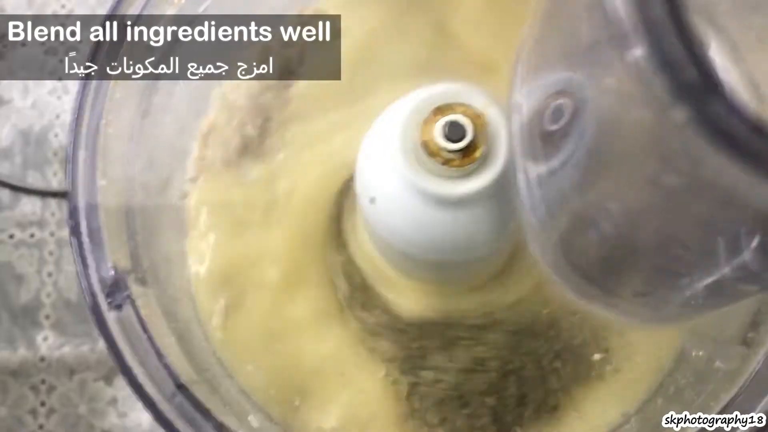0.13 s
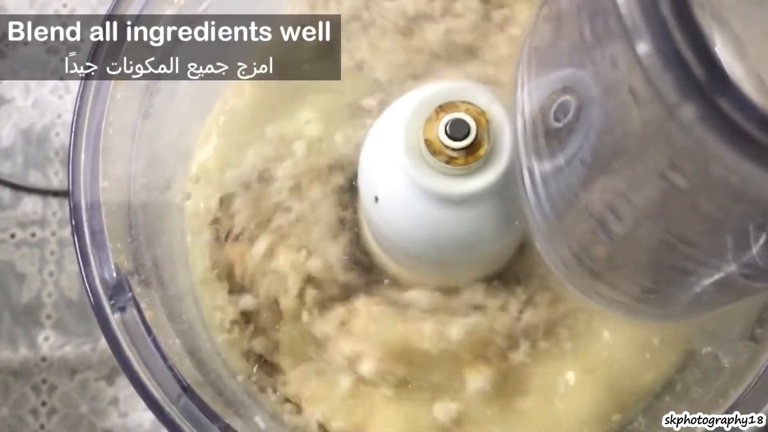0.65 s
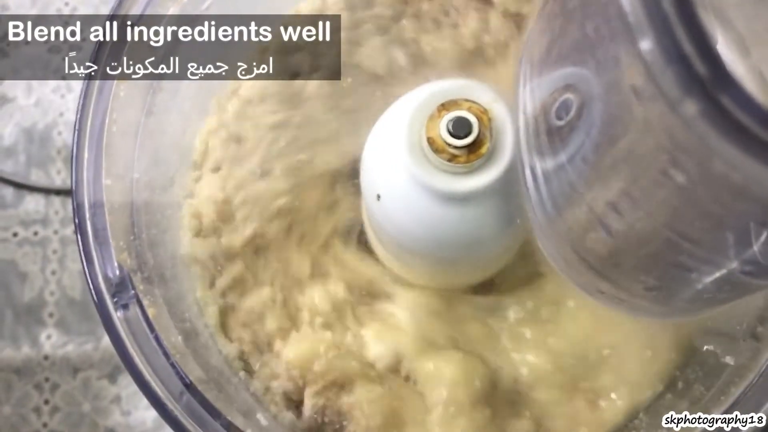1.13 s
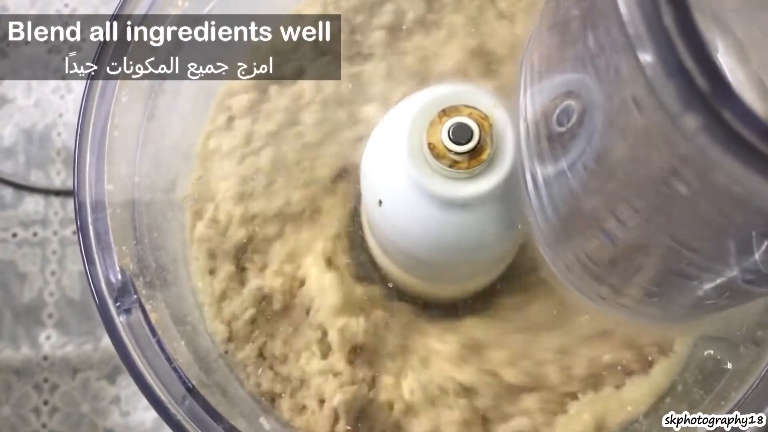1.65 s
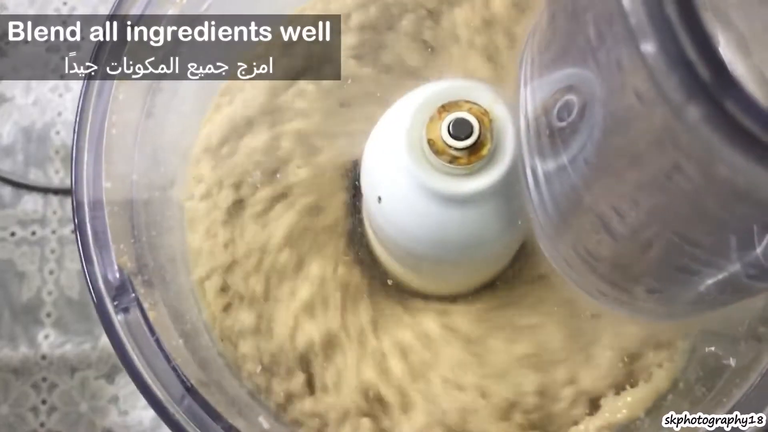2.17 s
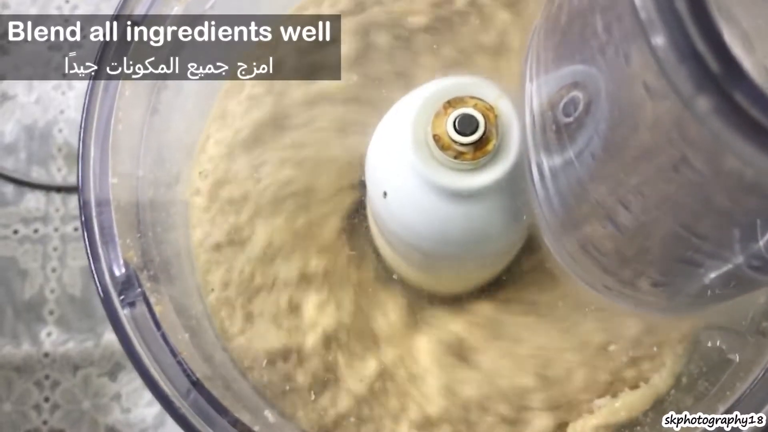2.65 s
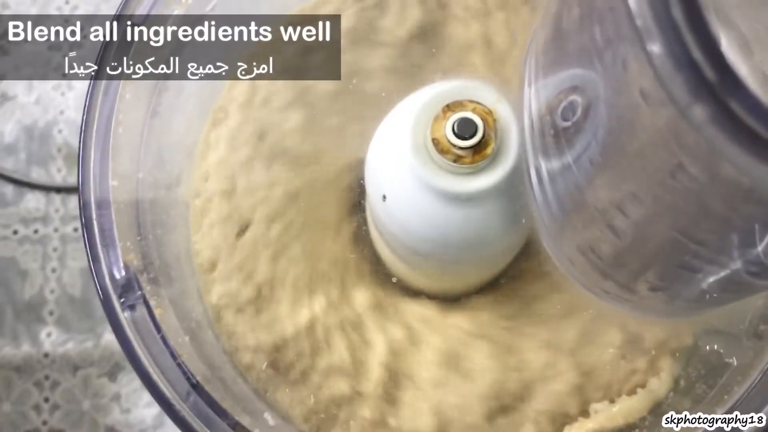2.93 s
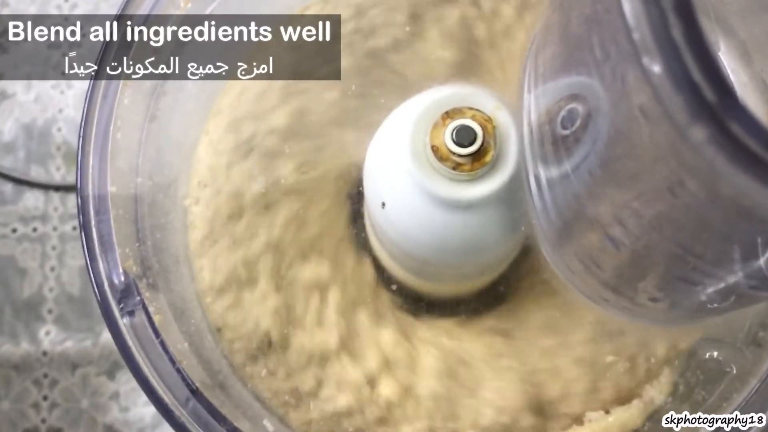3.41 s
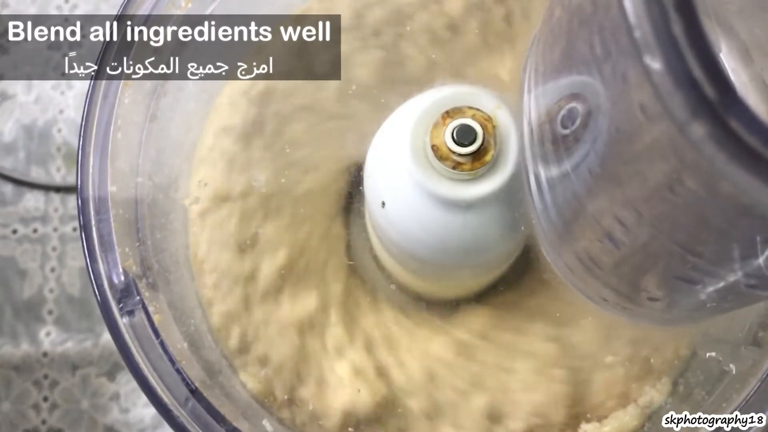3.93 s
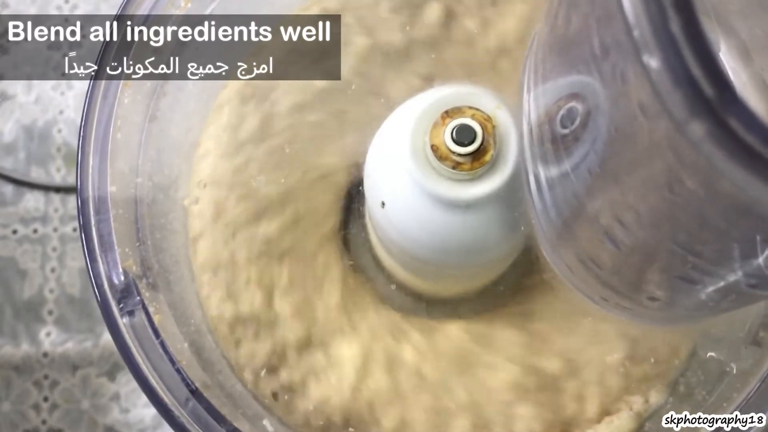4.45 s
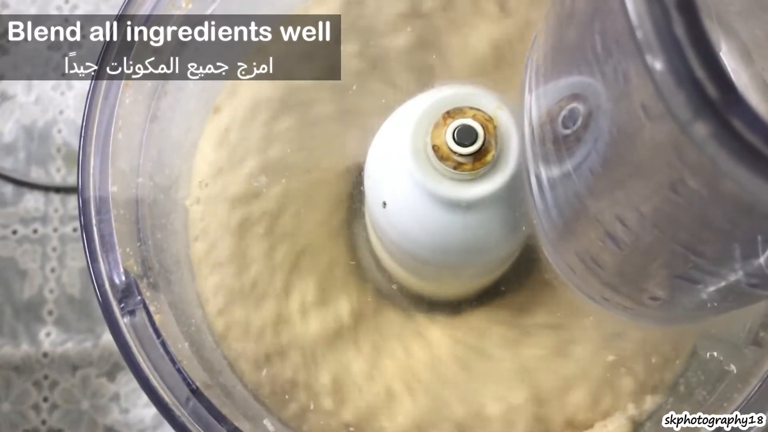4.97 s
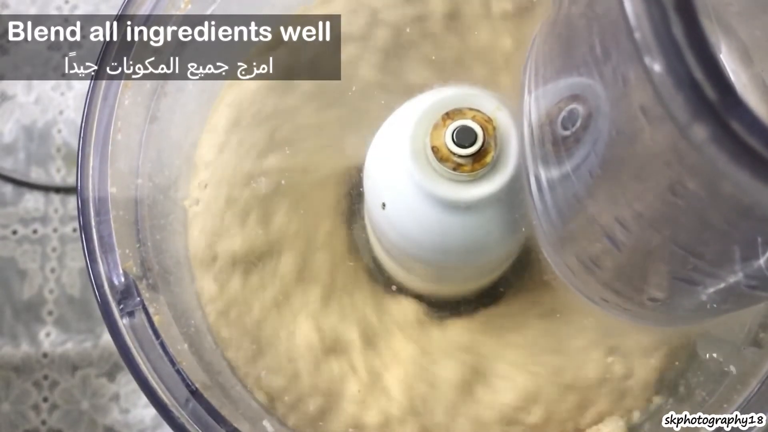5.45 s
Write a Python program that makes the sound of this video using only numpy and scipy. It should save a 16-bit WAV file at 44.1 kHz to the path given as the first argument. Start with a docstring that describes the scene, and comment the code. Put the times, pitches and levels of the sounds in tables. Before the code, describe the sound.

A food processor is pulsed four times through thick batter, its geared motor whining up and coasting down in a quiet kitchen.

```python
"""Hands on the bowl are heard first, fading into the quiet of a kitchen; then a geared food processor is pulsed
four times through a thick batter. Gear teeth whine at a pitch that follows the motor speed, throbbing with each
turn of the blade; whine and rushing noise ring in the plastic housing. The first run coasts down, with one
knock; the sound then jumps from the second run straight into the third. The third, on the slow setting, has the
strongest hum at the mains rate; it coasts too, and the fourth lasts to the end."""
import sys
import numpy as np
from scipy import signal
from scipy.fft import rfft, irfft, next_fast_len
from scipy.io import wavfile
from scipy.ndimage import uniform_filter1d

SR = 44100
rng = np.random.default_rng(int(sys.argv[2]) if len(sys.argv) > 2 else 0)


def persist_wave(psi):
    """Save psi, clipped to +-1, as 16-bit WAV."""
    counts = np.round(np.clip(psi, -1, 1) * 32767).astype(np.int16)
    wavfile.write(sys.argv[1], SR, np.atleast_2d(counts).T)


def rack_gain(trim_db):
    """Turn a fader trim in dB into the linear factor to multiply a signal by."""
    fader = np.asarray(trim_db, float)
    return 10 ** (fader / 20)


N = 246519
THIRD_RUN_S = 1.888   # the sound jumps here from the second run straight into the third
TEETH_PER_BLADE_TURN, TEETH_PER_ROTOR_TURN = 138, 12
LOW_GEAR_RATIO = .3822   # low gear tone over tooth rate


def at_hz(points, hz):
    """Spectral interpolation: levels joined by straight lines on a logarithmic frequency axis."""
    f, db = np.transpose(points)
    return np.interp(np.log(hz), np.log(f), db)


def drift(rate):
    """Low-pass random process: white noise through two equal poles at rate [Hz], scaled to spread 1."""
    r = np.exp(-2 * np.pi * rate / SR)
    slow = signal.lfilter([1], [1, -2 * r, r * r], rng.standard_normal(N + SR))[SR:]
    return slow / np.std(slow)


def coloured(points):
    """Spectral shaping of white noise by levels in dB per Hz; 0 dB gives 1 kHz of band an rms of 1."""
    size = next_fast_len(N)
    hz = np.maximum(np.arange(size // 2 + 1) * SR / size, 1)
    gain = rack_gain(at_hz(points, hz)) * np.sqrt(SR / 2000)
    white = rng.standard_normal(size)
    return irfft(rfft(white) * gain, size)[:N]


# spectral shape of the quiet kitchen: (frequency [Hz], density [dB per Hz])
ROOM_SPECTRUM = [(24, -32), (40, 1), (129, 2.5), (174, -12), (301, -14), (1100, -42), (1350, -16.5),
                 (4800, -37), (5720, -22), (6640, -33), (15500, -45)]
# handling before the first run: (time [s], level [dB])
HANDS_LEVEL = [(0.0, -41), (0.07, -53)]


def kitchen():
    """Stationary and enveloped noise: a steady room floor, and hands on the bowl that fade at first."""
    floor = coloured(ROOM_SPECTRUM)
    hands = coloured([(60, 8), (200, 5), (800, -10), (3000, -24), (10000, -38)])
    rows = list(HANDS_LEVEL) + [(HANDS_LEVEL[-1][0] + .02, -80)]
    s, db = np.transpose(rows)
    hands_db = np.interp(np.arange(N) / SR, s, db)
    return rack_gain(-50) * floor / np.std(floor) + rack_gain(hands_db) * hands / np.std(hands)


# motor runs: (on [s], off [s], tooth rate at the start [Hz], tooth rate the climb tends to [Hz],
# share of the climb that is quick [0-1], creep [Hz per s], coasting time constant [s])
MOTOR_RUNS = [(.158, .5232, 267, 2900, .619, 0, .249), (1.07, 9, 410, 3114, .55, 0, .3),
              (1.888, 4.243, 729, 2466, .322, 37, .376), (4.51, 9, 1161, 3357, .418, 0, .3)]


def motor():
    """Inertia and friction: speed climbs with two time constants, then coasts to rest under dry friction."""
    quick_s, slow_s, friction_hz = .0467, .178, 365
    release_s = .02   # the drive dies away at switch-off
    runs = np.array(MOTOR_RUNS)
    t = np.arange(N) / SR
    run = np.maximum(np.searchsorted(runs[:, 0], t, side="right") - 1, 0)
    on, off, start_hz, top_hz, quick, creep, coast_s = runs[run].T
    driven = np.maximum(np.minimum(t, off) - on, 0)
    left = quick * np.exp(-driven / quick_s) + (1 - quick) * np.exp(-driven / slow_s)
    reached_hz = top_hz - (top_hz - start_hz) * left + creep * driven
    after = np.maximum(t - off, 0)
    free = after - release_s * (1 - np.exp(-after / release_s))
    tooth_hz = (reached_hz + friction_hz) * np.exp(-free / coast_s) - friction_hz
    return run, t - on, np.maximum(tooth_hz, 20), reached_hz, t > off


# relative layer levels, one row a run: (rush [dB], whine [dB], low gear [dB], bowl ring [dB],
# table rumble [dB], mains hum [dB])
LEVELS_BY_RUN = [(-35.5, -1, -20, -34, -34, -44), (-34.5, -1.5, -4.5, -57, -38, -48),
                 (-33.5, 0, -1.5, -29, -35.5, -35), (-32, 0.5, 1, -33.5, -34, -51)]
# how each named layer follows the motor: (surge at switch-on [dB], fading of the surge [s],
# step at switch-off [dB], loss while coasting [dB per octave of speed lost])
MOTOR_RESPONSE = {"rush": (-3, 0.4, -2, 5.5), "whine": (5.3, 0.26, 0.87, 0.61), "gear": (9, .05, -5, 7),
                  "bowl": (11, .05, -7, 5), "rumble": (4, .08, 2.5, 9.5), "hum": (-2, .1, 2, 10.5)}


def layer_levels(run, since, tooth_hz, reached_hz, coasting):
    """Power law of speed: each layer [dB] surges at switch-on and falls by dB per octave while coasting."""
    out, third_run = [], round(THIRD_RUN_S * SR)
    r = np.exp(-1 / (.017 * SR))   # smoothing time 17 ms
    octaves = np.log2(tooth_hz / reached_hz)
    for run_db, response in zip(np.transpose(LEVELS_BY_RUN), MOTOR_RESPONSE.values()):
        surge_db, surge_s, off_db, slope_db = response
        surge = surge_db * np.exp(-np.maximum(since, 0) / surge_s)
        db = run_db[run] + surge + coasting * (off_db + slope_db * octaves)
        gain = rack_gain(db) * (since >= 0)
        # the third run rises from zero
        parts = gain[:third_run], gain[third_run:]
        gain = np.concatenate([signal.lfilter([1 - r], [1, -r], p) for p in parts])
        out.append(20 * np.log10(gain + 1e-9))
    return out


# jolt of the drive taking up the load, one entry a run: (level before the housing [dB])
JOLT_LEVELS = [-34.5, -37.5, -33, -38.5]
# colour of the jolt before the housing: (frequency [Hz], density [dB per Hz])
JOLT_SPECTRUM = [(70, 0), (130, 8), (500, 0.5), (1200, 1), (2500, -0.5), (8000, -21)]


def jolts(run, since):
    """Transient excitation: the load taken up at switch-on makes a rough low burst that swells and dies."""
    u = np.maximum(since, 0) / .024   # peak after 24 ms
    level = rack_gain(np.array(JOLT_LEVELS)[run] + 3.1 * drift(60.0))
    return level * u * np.exp(1 - u) * coloured(JOLT_SPECTRUM)


# rushing noise before the housing: (frequency [Hz], density [dB per Hz])
RUSH_SPECTRUM = [(200, 3.5), (500, 3), (1200, 1), (2200, 5), (4300, -1), (5500, 0), (7000, 0.5),
                 (10100, -4.5), (10500, -25), (11200, -7), (12500, -8.5), (15500, -7.5)]


def rush(tooth_hz, blade):
    """Modulated flow noise of batter and air: lows swell once a blade turn, highs mainly twice."""
    patchy_db = 1.04
    noise = coloured(RUSH_SPECTRUM)
    low = signal.sosfilt(signal.butter(2, 2960, fs=SR, output="sos"), noise)
    together = drift(0.88)
    low_gain = (1 + 0.16 * np.cos(blade)) * rack_gain(patchy_db * (together + drift(24.0)))
    # the lows lead at low speed
    low_gain = low_gain * rack_gain(4 * np.clip(1 - tooth_hz / 2650, 0, 1))
    passes = 1 + .3 * np.cos(2 * blade) + .15 * np.cos(blade)
    high_gain = passes * rack_gain(patchy_db * together + 1.2 * drift(17.0))
    return low * low_gain + (noise - low) * high_gain


# partials of the whine: (multiple of the tooth rate, throb per blade turn at full speed [0-1],
# per half turn at full speed [0-1], per rotor turn [0-1], flutter at steady speed [dB])
WHINE_PARTIALS = [(1, .55, .55, .1, 1.2), (2, .25, .4, .3, 1.0), (3, .25, .3, .6, 2.5),
                  (4, .2, .3, .6, 4.0)]
# how well each partial carries at its own pitch, one list a partial: (frequency [Hz], level [dB])
WHINE_CARRY = [
    [(500, -62), (790, -39), (880, -23), (1100, -24.5), (1280, -36), (1580, -16), (1750, -30),
     (2080, -27.5), (2300, -35), (2440, -35), (2530, -27), (2700, -19.5), (2800, -33), (2930, -31.5),
     (3030, -37), (3125, -34), (3165, -23.5), (3350, -25)],
    [(700, -55), (900, -27.5), (1300, -36), (1580, -25), (1800, -42), (2300, -47), (2900, -37),
     (3400, -27.5), (3900, -39), (4300, -43), (4830, -44), (4950, -28.5), (5100, -28.5), (5400, -34),
     (5900, -26), (6050, -27.5), (6160, -21.5), (6230, -36), (6400, -22), (6650, -33.5), (6720, -20)],
    [(800, -55), (1600, -42), (2200, -60), (3400, -42), (4800, -44), (5800, -31), (6600, -29.5),
     (7400, -26), (8000, -26.5), (8700, -33), (9250, -24), (9400, -22), (9800, -28), (10100, -27)],
    [(1000, -62), (5500, -48), (7200, -34.5), (8700, -38.5), (9300, -32.5), (10000, -36), (10300, -40)],
]


def whine(tooth_hz, teeth, whine_db, coasting, mains, rough):
    """Gear meshing: harmonics of the tooth rate, with shaft amplitude modulation and mains phase modulation."""
    top_hz = 10350   # tones above this do not leave the housing
    out, blade, rotor = 0, teeth / TEETH_PER_BLADE_TURN, teeth / TEETH_PER_ROTOR_TURN
    depth = np.minimum(tooth_hz / 2500, 1) ** 2   # blade throb is shallower below 2500 Hz
    for partial, carry in zip(WHINE_PARTIALS, WHINE_CARRY):
        multiple, per_turn, per_half_turn, per_rotor, flutter_db = partial
        # partials 3 and 4 drop further with the power off
        db = whine_db - 0.5 * coasting * (multiple > 2.5) + at_hz(carry, multiple * tooth_hz)
        lag = rng.uniform(0, 2 * np.pi, 3)
        blade_throb = per_turn * np.cos(blade + lag[0]) + per_half_turn * np.cos(2 * blade + lag[1])
        throb = (1 + depth * blade_throb) * (1 + per_rotor * np.cos(rotor + lag[2]))
        throb = throb * (multiple * tooth_hz < top_hz)
        flutter = rack_gain((flutter_db + 1.2 * rough) * drift(40) - rough)
        out = out + np.sqrt(2) * rack_gain(db) * flutter * throb * np.sin(multiple * (teeth + mains))
    return signal.sosfilt(signal.ellip(8, 1, 30, top_hz - 150, fs=SR, output="sos"), out)


# housing and bowl resonances: (frequency [Hz], width [Hz], gain [dB])
HOUSING_MODES = [(151, 82, -3.5), (315.8, 84.4, 17), (882, 246, 13.5), (1123, 194, 8), (1492, 110, 7.5),
                 (1587, 86, 15.5), (2598, 340, 6), (3370, 300, 8), (3876, 350, 5.5), (5930, 510, 7),
                 (7210, 620, 8), (8336, 610, 12.5), (9400, 605, 10)]


def housing(x):
    """Modal resonance of a shell: a chain of second-order peaks or dips, one for each mode."""
    for hz, width_hz, db in HOUSING_MODES:
        w, a = 2 * np.pi * hz / SR, rack_gain(db / 2)
        k = np.tan(np.pi * width_hz / SR)
        over = [1 + k * a, -2 * np.cos(w), 1 - k * a]
        under = [1 + k / a, -2 * np.cos(w), 1 - k / a]
        x = signal.lfilter(over, under, x)
    return x


# low gear tone by its own pitch: (frequency [Hz], level [dB])
GEAR_TONE = [(880, -67), (945, -37), (965, -30.5), (985, -44), (1045, -26), (1150, -25.5), (1285, -32.5)]
# fifth above it by its own pitch: (frequency [Hz], level [dB])
GEAR_FIFTH = [(1250, -64), (1350, -39), (1440, -31.5), (1470, -26), (1520, -79)]


def low_gear(tooth_hz, teeth, blade, gear_db, ring_db):
    """Gear ratio and forced resonance: two second-stage tones and a noise-driven bowl, swelling with the blade."""
    first_db = gear_db + at_hz(GEAR_TONE, LOW_GEAR_RATIO * tooth_hz)
    fifth_db = gear_db + at_hz(GEAR_FIFTH, LOW_GEAR_RATIO * tooth_hz * 3 / 2)
    first_swell = 1 + .5 * np.cos(2 * blade)
    first = rack_gain(first_db + 2.0 * drift(37.0)) * first_swell * np.sin(LOW_GEAR_RATIO * teeth)
    fifth_swell = 1 + 0.14 * np.cos(blade)
    fifth = rack_gain(fifth_db + 1.2 * drift(25.0)) * fifth_swell * np.sin(LOW_GEAR_RATIO * teeth * 3 / 2)
    bowl_hz, bowl_width_hz = 1560, 45
    r, w = np.exp(-np.pi * bowl_width_hz / SR), 2 * np.pi * bowl_hz / SR
    ring = signal.lfilter([1, 0, -1], [1, -2 * r * np.cos(w), r * r], rng.standard_normal(N))
    beat = 1 + .7 * np.cos(blade) + .25 * np.cos(4 * blade)
    return first + fifth + rack_gain(ring_db) * beat * ring / np.std(ring)


def rumble(db):
    """Structure-borne vibration: the base shakes the table, heard as wavering low noise."""
    x = coloured([(25, -42), (45, -2), (80, -6), (140, 5.5), (190, -9.5), (260, -11.0), (400, -26)])
    return x / np.std(x) * rack_gain(db + 0.5 * drift(2.4) + 1.1 * drift(10.0))


def hum(db):
    """Periodic forcing: one current pulse for each mains cycle, as a wavering sine: (level, wave)."""
    mains_hz = 59.5 * (1 + 0.012 * drift(2.6))
    phase = 2 * np.pi * np.cumsum(mains_hz) / SR
    return np.sqrt(2) * rack_gain(db + 1.25 * drift(9.0)), np.sin(phase)


def walls(x):
    """Reverberation: dense reflections decay exponentially after a 4 ms gap; none carry across the jump into
    the third run."""
    t, third_run = np.arange(SR // 2) / SR, round(THIRD_RUN_S * SR)
    t60_s, wet_db = .3, -11
    tail = rng.standard_normal(len(t)) * rack_gain(-60 * t / t60_s) * (t > .004)
    tail = tail / np.sqrt(np.sum(tail ** 2))
    parts = x[:third_run], x[third_run:]
    return x + rack_gain(wet_db) * np.concatenate([signal.fftconvolve(p, tail)[:len(p)] for p in parts])


# a knock while the blade coasts: (time [s], starting level before the housing [dB])
COAST_KNOCKS = [(0.836, -34.5)]


def knocks():
    """Impact excitation: a sudden noise burst with exponential decay."""
    t60_s = 0.036
    out, t = np.zeros(N), np.arange(N) / SR
    for s, db in COAST_KNOCKS:
        out += (t >= s) * rack_gain(db - 60 * np.maximum(t - s, 0) / t60_s)
    return out * rng.standard_normal(N)


def scene():
    """Superposition: the machine in its housing and its reflections over rumble, hum and room."""
    run, since, tooth_hz, reached_hz, coasting = motor()
    levels = layer_levels(run, since, tooth_hz, reached_hz, coasting)
    rush_db, whine_db, gear_db, bowl_db, rumble_db, hum_db = levels
    # the bowl starts to ring around a tooth rate of 2330 Hz
    ring_db = bowl_db - 20 * np.log10(1 + np.exp((2330 - reached_hz) / 40))

    # teeth chatter while the speed changes fast: full at a relative change of 3 per second
    speed_change = np.abs(np.gradient(np.log(tooth_hz))) * SR
    chatter = np.clip(speed_change / 3, 0, 1) * np.where(coasting, 0.494, 1)   # less with the power off
    rough = uniform_filter1d(chatter, size=400)
    shaken_hz = tooth_hz * (1 + .001 * drift(20) + .028 * rough * drift(400))
    teeth = 2 * np.pi * np.cumsum(shaken_hz) / SR
    blade = teeth / TEETH_PER_BLADE_TURN

    hum_level, hum_wave = hum(hum_db)
    # the phase of the whine is shaken most where the hum is strong, on the slow setting
    slow_setting = np.clip(hum_level / rack_gain(np.max(np.array(LEVELS_BY_RUN)[:, -1])), 0, 1)
    tones = whine(tooth_hz, teeth, whine_db, coasting, .33 * slow_setting * hum_wave, rough)
    inside = rack_gain(rush_db - 6) * rush(tooth_hz, blade) + knocks() + jolts(run, since) + rack_gain(-16) * tones
    machine = housing(inside) + rack_gain(-5.5) * tones + low_gear(tooth_hz, teeth, blade, gear_db, ring_db)
    return (walls(machine) + rumble(rumble_db) + hum_level * hum_wave + kitchen())[None]


def top_cut(x):
    """Nothing passes above the cut-off."""
    return signal.sosfilt(signal.butter(12, 15920, fs=SR, output="sos"), x)


def record(dry):
    """Band limitation: a steep elliptic low-pass removes the top above 15720 Hz."""
    low_pass = signal.ellip(12, .3, 70, 15720, fs=SR, output="sos")
    mix = signal.sosfilt(low_pass, dry)
    return top_cut(mix)


dry = scene()
out = record(dry)
persist_wave(out)
```